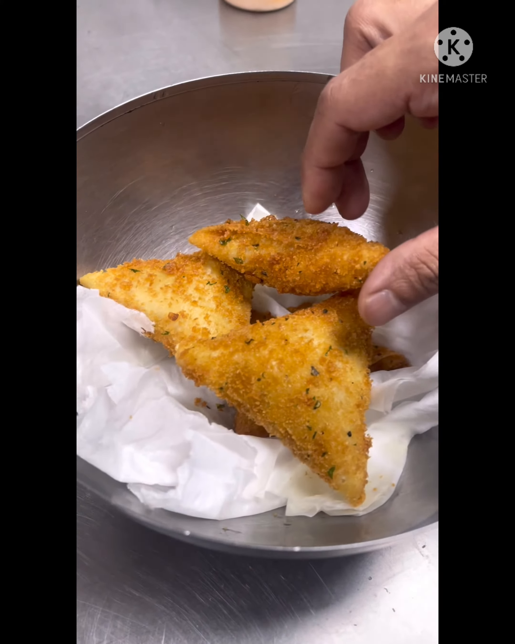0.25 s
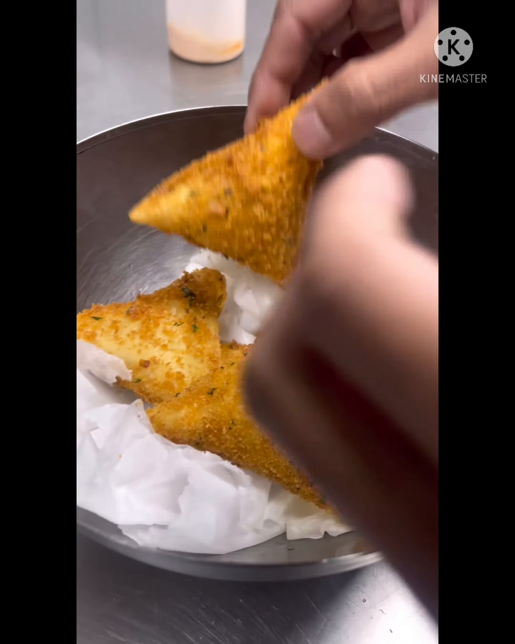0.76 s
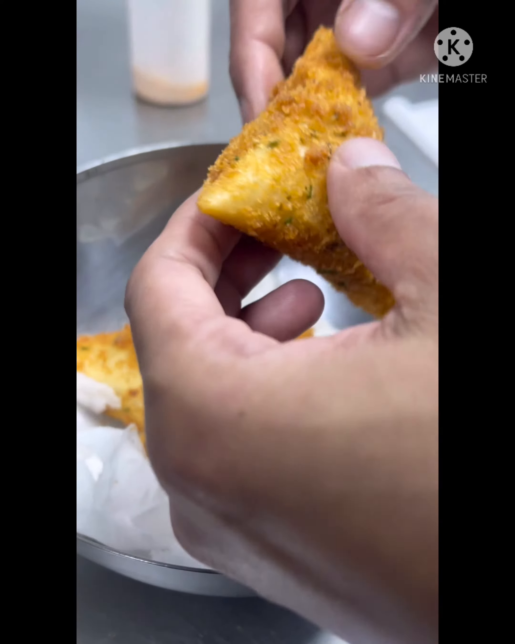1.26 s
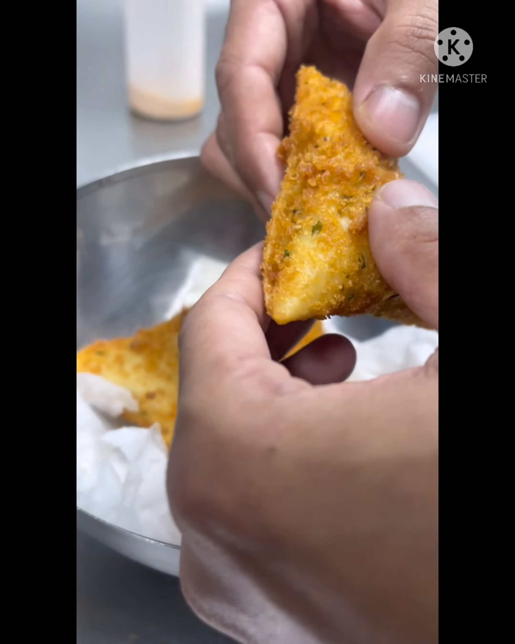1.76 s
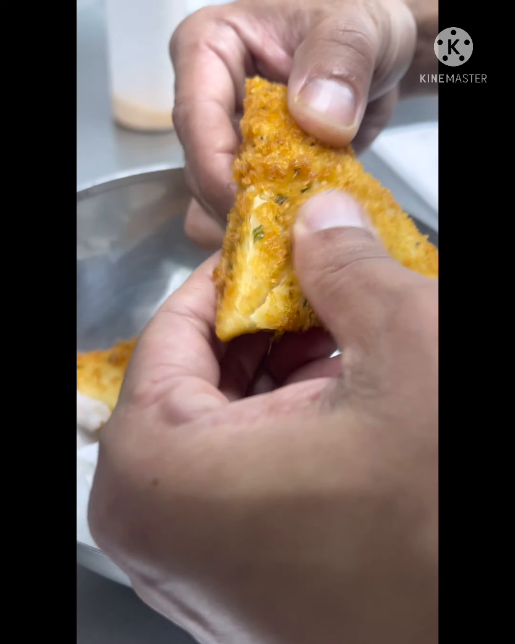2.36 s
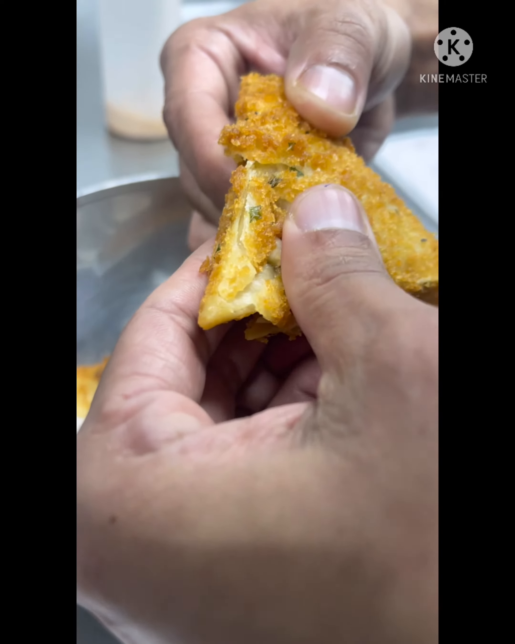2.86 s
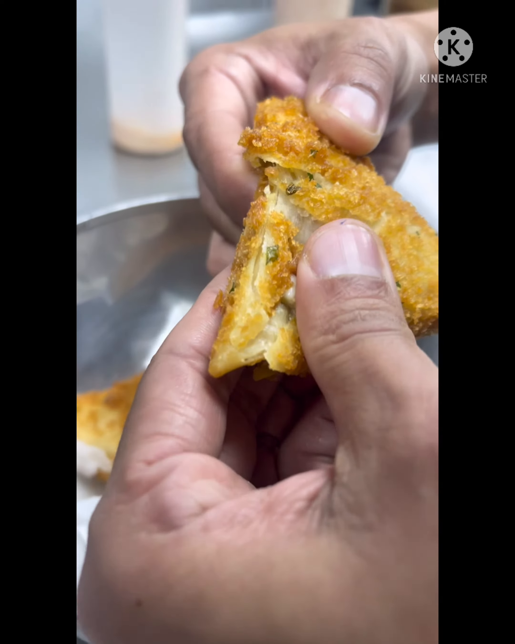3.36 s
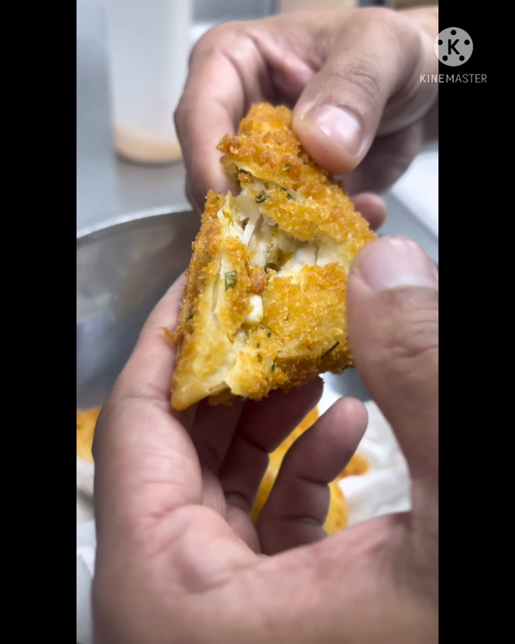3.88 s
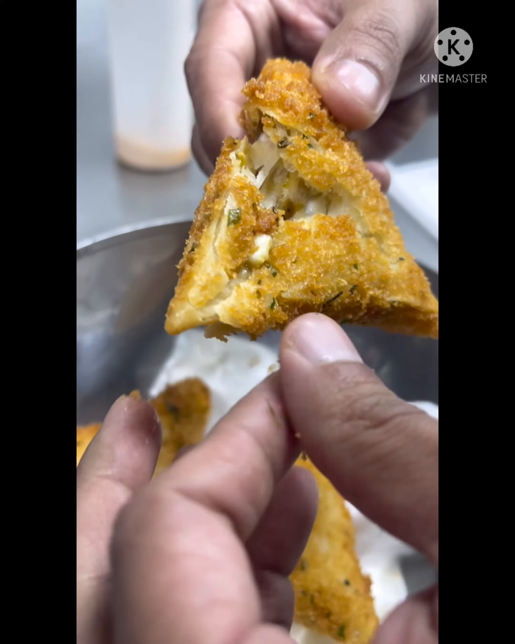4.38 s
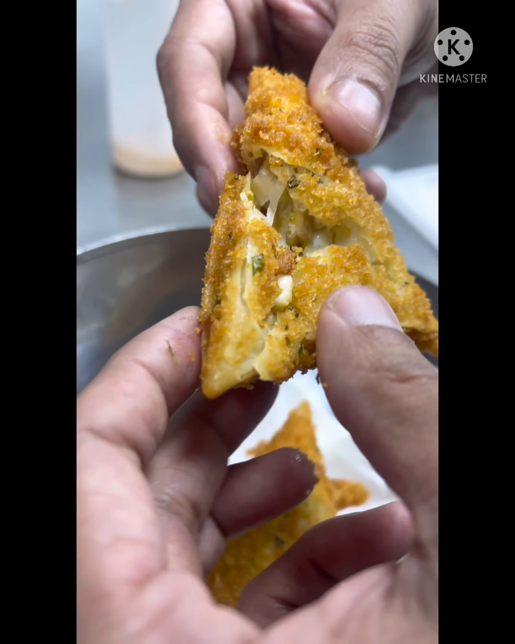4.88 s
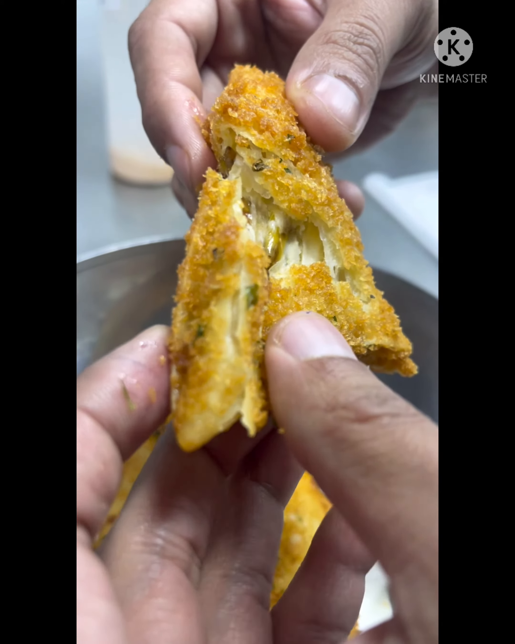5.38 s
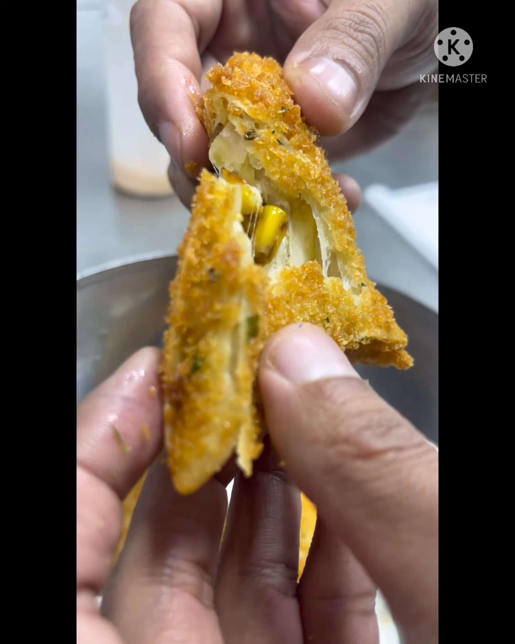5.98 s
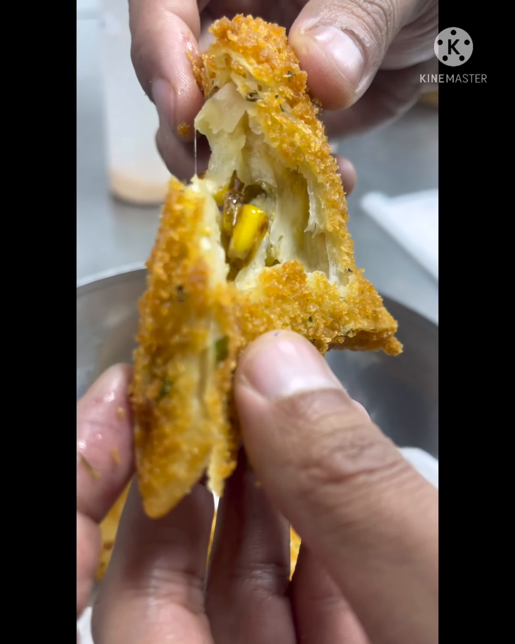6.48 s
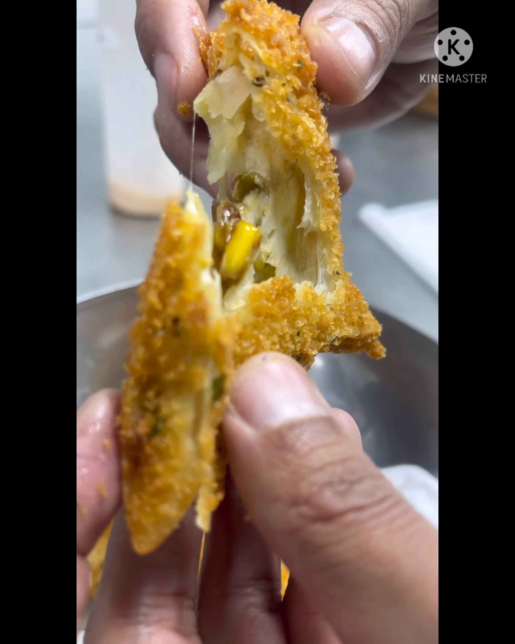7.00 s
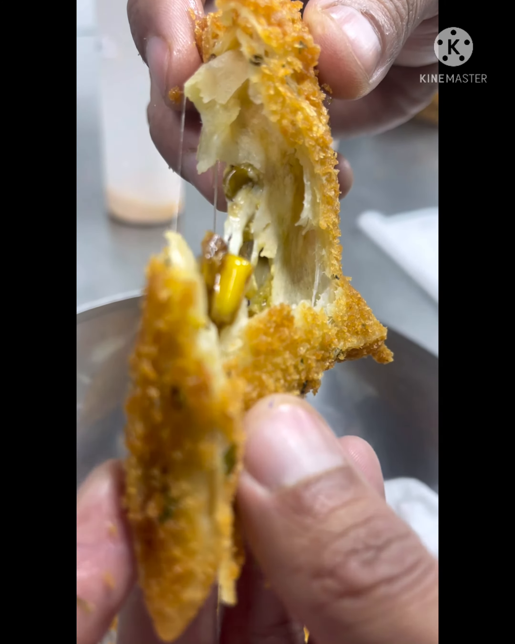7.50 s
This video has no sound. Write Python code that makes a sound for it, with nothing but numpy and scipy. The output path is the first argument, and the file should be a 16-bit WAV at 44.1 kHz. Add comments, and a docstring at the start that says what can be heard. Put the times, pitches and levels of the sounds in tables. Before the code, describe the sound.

Over the steady low rumble of a kitchen fan, paper rustles and a steel bowl scrapes and briefly squeaks as fingers pick up a breaded snack. Near the microphone the crust crackles, gives one crisp crunch and thins out into scattered little snaps. A heavy panel thumps twice across the room, the second time much louder, with a tiny high tink in between.

```python
"""In a kitchen, a breaded fried pastry is lifted from a paper-lined steel bowl and torn open close by.
Its crust fails by brittle fracture: single snaps, then one crunch with popping air pockets.
Friction grinds crumbs under the fingers and draws scrapes and squeaks from paper and steel;
a light touch rings one bright tink. Further off a heavy panel booms twice, and ventilation rumbles."""
import sys
import numpy as np
from scipy import signal
from scipy.fft import rfft, irfft
from scipy.io import wavfile
from scipy.ndimage import uniform_filter1d

SR = 44100
rng = np.random.default_rng(int(sys.argv[2]) if len(sys.argv) > 2 else 0)


def unload_wav(signal):
    """Save mono or channel-first audio to the path in sys.argv[1] as 16-bit WAV at rate SR, clipped to [-1, 1]."""
    wavfile.write(
        sys.argv[1],
        SR,
        np.round(np.clip(np.atleast_2d(signal).T, -1, 1) * 32767).astype(np.int16),
    )


N = 341504

# snaps of the crust: (time [s], level of the bright part [dB], level of the duller, lower part [dB])
SNAPS = [(0.2563, -50, -47), (0.2597, -48, -45), (0.2708, -47, -41), (0.4951, -49, -52), (0.5488, -55, -47),
         (0.5996, -44, -43), (0.6117, -42, -44), (0.6305, -39, -50), (0.638, -32, -50), (0.6445, -38, -50),
         (0.6521, -30, -40), (0.6562, -32, -43), (0.66, -26, -43), (0.682, -35, -43), (0.6931, -41, -42),
         (0.7135, -44, -42), (0.7264, -44, -51), (0.805, -49, -46), (0.8185, -38, -51), (0.8225, -49, -47),
         (0.8749, -42, -48), (0.891, -41, -45), (0.9178, -40, -47), (0.9211, -40, -48), (0.953, -37, -35),
         (0.956, -41, -41), (0.959, -44, -49), (0.9857, -49, -36), (0.992, -49, -40), (1.035, -39, -51),
         (1.1045, -49, -38.5), (1.249, -49, -52), (1.3673, -50, -51), (1.6045, -45, -51),
         (1.6649, -50, -41), (1.7264, -35, -41), (1.8461, -46, -50), (1.8513, -49, -53),
         (1.867, -34, -38.5), (1.978, -50, -48), (1.988, -36, -42), (2.0108, -33.5, -44),
         (2.0315, -49, -52), (2.066, -43, -48), (2.077, -44, -54), (2.0832, -25, -38), (2.0991, -27, -33.5),
         (2.1291, -29.5, -42), (2.1479, -43, -52), (2.1667, -41, -48), (2.2108, -38, -45),
         (2.2204, -30, -41), (2.23, -34, -42), (2.2554, -44, -53), (2.2625, -44, -47), (2.285, -26, -46),
         (2.3298, -36, -52), (2.3326, -36, -31), (2.3355, -37, -44), (2.343, -37, -44), (2.3563, -36, -34),
         (2.3588, -25, -39), (2.361, -30, -43), (2.3752, -34, -46), (2.3975, -28, -27.5),
         (2.4023, -19.5, -34), (2.416, -32, -34), (2.4194, -21, -31), (2.4274, -21, -31),
         (2.4302, -20, -36), (2.4353, -17, -29), (2.4395, -20, -28), (2.4447, -25, -31), (2.4555, -29, -37),
         (2.4698, -36, -33), (2.4765, -22, -28), (2.4806, -35, -38), (2.513, -43, -39), (2.5171, -42, -52),
         (2.5232, -42, -50), (2.5653, -37, -52), (2.5906, -43, -54), (2.7276, -49, -50),
         (2.7306, -34.5, -52), (2.7464, -37, -51), (2.7704, -35.5, -46), (2.8009, -42, -41),
         (2.8234, -44, -50), (2.8611, -41, -46), (2.899, -43, -39.5), (2.986, -47, -55), (3.0088, -48, -55),
         (3.0342, -49, -47), (3.0524, -40, -36.5), (3.0898, -49, -49), (3.3151, -47, -38.5),
         (3.3252, -44, -52), (3.336, -53, -51), (3.4137, -53, -48), (3.4473, -47, -42), (3.474, -51, -41),
         (3.486, -48, -48), (3.5084, -47, -43), (3.5185, -50, -48), (3.527, -41, -36.5), (3.5406, -43, -41),
         (3.5445, -48, -47), (3.5502, -53, -47), (3.5692, -48, -51), (3.6092, -48, -57), (3.8235, -52, -43),
         (3.8339, -44, -37.5), (4.3158, -50, -57), (4.55, -47, -55), (4.7272, -37.5, -51),
         (5.978, -38, -49), (7.0106, -46, -39.5), (7.4392, -44, -46), (7.5445, -52, -50), (7.571, -39, -54),
         (7.6704, -60, -50), (7.719, -42, -43), (7.7234, -52, -47)]
# bright part of a snap, as coloured by the microphone: (frequency [Hz], level [dB])
BRIGHT_SPECTRUM = [(1500, -45), (3500, -14), (5500, -17), (8000, -6.5), (10000, 1.5), (11200, 5),
                   (12200, 0), (13300, -19), (14500, -25), (16300, -49)]
# duller part of a snap, and the hollow inside the pastry: (frequency [Hz], level [dB])
DULL_SPECTRUM = [(400, 7.5), (1300, -12), (2500, 2), (4000, 1.5), (5500, 0.5), (7000, 2), (8500, 5.5),
                 (10500, 1), (14000, -12), (16300, -28)]
HOLLOW_SPECTRUM = [(250, -38), (600, 1.5), (1300, 10), (1900, 2.5), (2500, 11.5), (3100, -3), (4500, 1),
                   (7000, -17)]

def cracks(rise=0.00055, fall=0.00027, lead_s=0.0029, trail_fall=0.0027):
    """Brittle fracture: a crack runs through the crust, led and trailed by smaller breaks."""
    out, t = np.zeros(N), np.arange(SR // 40) / SR
    since = np.maximum(t - lead_s, 0)
    span = np.sqrt(0.002 * SR / len(t))  # levels are rms over 2 ms
    for start, bright_db, dull_db in SNAPS:
        burst = unit_rms(swell(since, rise, fall) ** 2 * rng.standard_normal(len(t)))
        before = unit_rms(swell(t, lead_s, fall) * rng.standard_normal(len(t)))
        after = unit_rms(swell(since, 2 * rise, trail_fall) * rng.standard_normal(len(t)))
        snap = burst + gain_of(-16) * before + gain_of(-14) * after
        hollow_db = 7.5 + 1.55 * dull_db  # mostly the deep cracks ring the hollow
        parts = (BRIGHT_SPECTRUM, bright_db), (DULL_SPECTRUM, dull_db + 1.5), (HOLLOW_SPECTRUM, hollow_db)
        for spectrum, db in parts:
            add(out, start - lead_s - rise, gain_of(db) * span * unit_rms(colour(snap, spectrum)))
    return out


# runs of breaking crumbs: (time [s], level [dB], rise [s], fall [s], relative hollow level [dB])
AVALANCHES = [(0.25, -45, 0.01, 0.029, 9), (0.642, -38, 0.0093, 0.013, 8), (0.672, -40.5, 0.019, 0.019, 7),
              (0.804, -41, 0.012, 0.018, 0), (0.851, -46, 0.023, 0.13, 9), (2.352, -36, 0.004, 0.071, -1),
              (2.397, -27, 0.011, 0.031, -1), (2.413, -22, 0.013, 0.02, 2), (2.473, -36, 0.0029, 0.016, 8)]
# spectrum of fine, bright crackle, with the top treble cut off: (frequency [Hz], level [dB])
CRACKLE_SPECTRUM = [(1500, -35), (3500, -12), (4900, -10), (5500, -7), (8000, -8), (8900, -1),
                    (10000, -5.5), (11200, 1), (12200, -2), (13500, -19), (14500, -33), (16300, -57)]

def crunches():
    """Cascading failure: avalanches of fractures crackle and excite the hollow inside."""
    out, t = np.zeros((2, N)), np.arange(SR // 5) / SR
    for start, db, rise, fall, hollow_db in AVALANCHES:
        envelope = swell(t, rise, fall)
        crackle = colour(envelope * grit(len(t), per_s=7600, spread_db=2.5), CRACKLE_SPECTRUM)
        hollow = colour(envelope * grit(len(t), per_s=7600, spread_db=2.5), HOLLOW_SPECTRUM)
        add(out, start, gain_of(db) * (crackle + gain_of(hollow_db - 9) * hollow))
    return out


# air pockets in the crust: (time [s], level [dB], frequency [Hz], fall [s])
AIR_POCKETS = [(0.9845, -38, 7460, 0.0012), (2.4153, -21, 1200, 0.0022), (2.4255, -25.5, 2140, 0.0046),
               (2.4265, -25.5, 2540, 0.004), (2.4305, -31, 640, 0.008), (2.476, -30.5, 1870, 0.0012),
               (7.4385, -35, 7050, 0.0011)]

def pops(rise=0.00047, ragged=0.34):
    """Damped oscillation: an air pocket caves in and rings briefly at its own frequency."""
    out, t = np.zeros(N), np.arange(SR // 20) / SR
    for start, db, hz, fall in AIR_POCKETS:
        waver = unit_rms(uniform_filter1d(rng.standard_normal(len(t)), size=30))
        envelope = (1 + ragged * waver) * swell(t, rise, fall)
        add(out, start, gain_of(db) * envelope * np.sin(2 * np.pi * hz * t))
    return out


# finger slides, one at each change of grip: (time [s], duration [s], relative level [dB])
FINGER_SLIDES = [(0.197, 0.42, -59), (0.57, 0.13, -49.5), (0.81, 0.17, -59), (1.11, 0.47, -64.5),
                 (1.601, 0.11, -50), (1.805, 0.13, -58), (1.994, 0.38, -54), (2.503, 0.42, -58),
                 (3.006, 0.11, -58), (3.43, 0.33, -56), (4.363, 0.084, -59), (4.529, 0.08, -56),
                 (4.714, 0.36, -59), (5.58, 0.16, -64), (6.266, 0.08, -62), (6.88, 0.19, -66),
                 (7.393, 0.18, -57.5)]
# spectrum of the rubbing of crumbs: (frequency [Hz], level [dB])
CRUMB_SPECTRUM = [(400, -24), (1200, 1), (2700, 5), (4500, -0.5), (7000, -2.5), (9500, 3), (11300, 2),
                  (12300, -6), (13200, -41), (14300, -46), (16000, -53)]

def rubbing(grip_s=0.027, release_s=0.05):
    """Granular friction: sliding fingers grind crumbs in dense small breaks and sparser large ones."""
    slip = np.full(N, gain_of(-73))  # just holding the pastry stirs a few crumbs
    t = np.arange(SR) / SR
    for start, duration, db in FINGER_SLIDES:
        stroke = np.minimum(t / grip_s, 1) * np.exp(-np.maximum(t - duration, 0) / release_s)
        add(slip, start, gain_of(db) * stroke)
    dense = colour(grit(N, per_s=3000, spread_db=3.5), CRUMB_SPECTRUM)
    sparse = colour(grit(N, per_s=560, spread_db=6), CRACKLE_SPECTRUM)
    return gain_of(2.5) * slip * (dense + gain_of(-7) * sparse)


# scrapes and paper rustles: (time [s], level [dB], centre [Hz], half-width [octaves], rise [s], fall [s])
DRAGS = [(0.328, -42, 3580, 0.53, 0.0054, 0.062), (0.59, -46, 4000, 3.2, 0.034, 0.075),
         (0.649, -36, 1600, 0.6, 0.0054, 0.01), (0.684, -35.5, 670, 0.51, 0.019, 0.013),
         (0.701, -36.5, 2750, 0.34, 0.014, 0.004), (0.83, -44, 2300, 2.5, 0.027, 0.18),
         (1.105, -49.5, 5500, 0.51, 0.0088, 0.055), (1.39, -43, 2150, 0.42, 0.015, 0.06),
         (1.405, -37, 667, 0.58, 0.013, 0.07), (1.636, -41.5, 3200, 0.45, 0.015, 0.079),
         (2.671, -41.5, 2700, 0.44, 0.011, 0.078), (3.33, -57, 4500, 1.5, 0.018, 0.16),
         (4.96, -48.5, 4500, 2, 0.043, 0.032), (7.41, -45, 8450, 0.6, 0.031, 0.085),
         (7.668, -51.5, 6000, 0.7, 0.008, 0.06)]
# modes of the steel bowl: (frequency [Hz], bandwidth [Hz], level re the plain scrape [dB])
BOWL_MODES = [(1850, 11, -12), (2096, 20, 10.5), (2635, 35, 10.5), (3300, 33, 6), (3620, 58, -18),
              (3940, 40, -5)]

def scrapes(top_hz=12000, gritty=0.54):
    """Friction noise: each soft drag excites one broad band, coloured by the bowl's resonances."""
    out, t = np.zeros((2, N)), np.arange(SR // 2) / SR
    hz = np.fft.rfftfreq(len(t), 1 / SR) + 1
    bowl = 1 + sum(gain_of(db) / (1 + 2j * (hz - mode_hz) / width) for mode_hz, width, db in BOWL_MODES)
    lowpass = (1 + (hz / top_hz) ** 40) ** -0.5
    for start, db, centre_hz, octaves, rise, fall in DRAGS:
        band = (1 + (np.log2(hz / centre_hz) / octaves) ** 4) ** -0.5
        drag = diffuse(len(t)) + gritty * grit(len(t), per_s=250, spread_db=-1)
        scrape = unit_rms(irfft(rfft(drag) * band * lowpass * bowl, len(t)))
        add(out, start, gain_of(db) * scrape * swell(t, rise, fall))
    return out


# skids on steel: (time [s], level [dB], pitch [Hz], rise [s], fall [s])
SKIDS = [(0.647, -33.5, 1546, 0.0093, 0.0056), (0.698, -39, 2990, 0.01, 0.0044),
         (1.395, -55, 1820, 0.025, 0.046), (1.64, -50, 2680, 0.012, 0.05)]
# partials of a skid: (frequency / pitch [ratio], level [dB])
SKID_PARTIALS = [(1.002, 2), (1.24, -6), (1.42, -8)]

def squeaks(jitter=0.019, flutter=0.49):
    """Stick-slip oscillation: a skid sings a few partials, unsteady in pitch and amplitude."""
    out, t = np.zeros((2, N)), np.arange(SR // 3) / SR
    for start, db, hz, rise, fall in SKIDS:
        tone = np.zeros((2, len(t)))
        for ratio, partial_db in SKID_PARTIALS:
            bend, grip = unit_rms(uniform_filter1d(rng.standard_normal((2, 2, len(t))), size=90))
            cycles = np.cumsum(hz * ratio * (1 + jitter * bend), axis=-1) / SR
            tone += gain_of(partial_db) * (1 + flutter * grip) * np.sin(2 * np.pi * cycles)
        add(out, start, gain_of(db) * unit_rms(spread(tone)) * swell(t, rise, fall))
    return out


# a light touch on something hard: (time [s], level [dB])
TOUCH = (4.3232, -23.5)
# its modes: (frequency [Hz], level [dB], T60 before the common fade [s])
TOUCH_MODES = [(8000, -12, .03), (8370, 7, 0.056), (10500, -5, .087), (10900, 1, 0.075), (11420, -2, 0.07),
               (11700, -2, .083), (12180, -11, .09), (13010, -17, .14)]
# spectrum of its chatter: (frequency [Hz], level [dB])
CHATTER_SPECTRUM = [(4000, -28), (6000, -20), (7500, -20), (8300, -3), (9200, 3), (10000, -2), (11400, -6),
                    (12900, -13), (13600, -28), (16000, -38)]

def tink(chatter_db=-11):
    """Impact excitation: a light touch rings a cluster of high modes, with a short chatter."""
    out, t = np.zeros(N), np.arange(SR // 5) / SR
    start, db = TOUCH
    modes = sum(gain_of(mode_db - 60 * t / t60) * np.sin(2 * np.pi * (hz * t + rng.random()))
                for hz, mode_db, t60 in TOUCH_MODES)
    ring = modes / abs(modes).max() * swell(t, rise=0.0017, fall=0.018)
    chatter = colour(rng.standard_normal(len(t)), CHATTER_SPECTRUM) * swell(t, rise=0.0012, fall=0.016)
    add(out, start, gain_of(db) * (ring + gain_of(chatter_db) * chatter))
    return out


# heavy bumps across the kitchen: (time [s], boom level [dB], rattle level [dB])
IMPACTS = [(3.9744, -25, -31.5), (6.4061, -10, -25)]
# modes of the panel: (frequency [Hz], level [dB], T60 before the common fade [s])
PANEL_MODES = [(172, -6, 0.13), (256, -2.5, 0.3), (289, 12, 0.054), (388, 13, 0.044), (439, -6, 0.21),
               (544, -6, 0.11), (694.5, -17, 0.22), (787, -7.5, 0.058), (893, -24, 0.3), (1088, -18, 0.074)]
# spectrum of the rattle: (frequency [Hz], level [dB])
RATTLE_SPECTRUM = [(90, -21), (200, 3.5), (420, 4.5), (700, -2.5), (1050, -9), (1650, -11.5), (2100, -18),
                   (3500, -20.5), (6500, -26), (11300, -21), (12400, -32), (13300, -60), (15000, -76)]

def bumps(rebound_s=0.0375, rebound_db=-10, room_db=-9, room_t60=0.39):
    """Modal vibration: a heavy panel booms, rattles and rebounds once; the boom reverberates."""
    out, t = np.zeros((2, N)), np.arange(SR * 3 // 4) / SR
    for start, db, rattle_db in IMPACTS:
        modes = sum(gain_of(mode_db - 60 * t / t60) * np.sin(2 * np.pi * hz * t)
                    for hz, mode_db, t60 in PANEL_MODES)
        boom = modes * swell(t, rise=0.018, fall=1)
        boom *= gain_of(db) / abs(boom).max()
        room = reflections(t, room_db, rise=0.045, fall=room_t60 / np.log(1000))
        rattle = colour(diffuse(len(t)), RATTLE_SPECTRUM) * swell(t, rise=0.0063, fall=0.071)
        add(out, start, boom)
        add(out, start + rebound_s, gain_of(rebound_db) * boom)
        add(out, start, signal.fftconvolve(boom[None], room, axes=1))
        add(out, start, gain_of(rattle_db) * rattle)
    return out


# duct rumble and rushing air: (frequency [Hz], spectral density [dB per Hz])
DUCT_SPECTRUM = [(18, -89), (31, -68), (42, -62), (62, -52), (80, -55), (140, -57.5), (210, -58),
                 (285, -57), (345, -58.5), (410, -70.5), (600, -72.5), (900, -77.5), (2000, -110),
                 (6000, -170)]
AIRFLOW_SPECTRUM = [(300, -101), (630, -74.5), (780, -81.5), (1000, -74), (1500, -79.5), (2000, -83.5),
                    (2800, -87.5), (3800, -93), (5200, -98), (8000, -97.5), (11200, -96.5), (12100, -109),
                    (13500, -140), (16000, -160)]
# tones of the fan: (frequency [Hz], rms level [dB])
FAN_PARTIALS = [(47.8, -41), (287, -48.5), (438, -59), (625, -60), (860, -60.5), (969, -63)]

def ventilation(waver=0.23, lowest_drift_hz=1.504):
    """Superposition: duct rumble and rushing air add in power beneath a few wavering fan tones."""
    hz = np.fft.rfftfreq(N, 1 / SR)
    density = np.hypot(gain_of(value_at(DUCT_SPECTRUM, hz)), gain_of(value_at(AIRFLOW_SPECTRUM, hz)))
    out = irfft(rfft(diffuse(N)) * density * np.sqrt(SR / 2), N)
    slow = np.exp(-(hz / 4) ** 2)  # passes fluctuations below about 4 Hz
    for tone_hz, db in FAN_PARTIALS:
        sway, drift = unit_rms(irfft(rfft(rng.standard_normal((2, N))) * slow, N))
        drift_hz = lowest_drift_hz * np.sqrt(tone_hz / FAN_PARTIALS[0][0])
        cycles = np.cumsum(tone_hz + drift_hz * drift) / SR
        out += gain_of(db) * np.sqrt(2) * (1 + waver * sway) * np.sin(2 * np.pi * cycles)
    return out


def kitchen(x, near_db=-11, room_db=-19, room_t60=0.18):
    """Reverberation: early reflections off hands and bowl, then the faint tail of a hard room."""
    t = np.arange(SR // 2) / SR
    early = reflections(t, near_db, rise=0.0006, fall=0.0028)
    late = reflections(t, room_db, rise=0.011, fall=room_t60 / np.log(1000))
    return x + signal.fftconvolve(x.mean(0)[None], early + late, axes=1)[:, :N]


def reflections(t, db, rise, fall):
    """Impulse response of a decaying diffuse field, with total energy db."""
    response = diffuse(len(t)) * swell(t, rise, fall)
    return gain_of(db) * response / np.linalg.norm(response[0])


# diffuse sound at the two microphone ports: (frequency [Hz], coherence [0 to 1])
COHERENCE = [(120, 1), (330, .97), (700, 0.058), (1200, 0.021), (1800, 0.91), (2700, 0.22), (3500, 0.057),
             (4900, 0.72), (5900, 0.66), (7200, 1), (9000, 1), (10200, 0.99), (11500, 0.98), (12300, 0.73)]

def spread(pair):
    """Partial coherence: two unrelated signals become one sound arriving from all sides."""
    size = pair.shape[-1]
    same = np.clip(value_at(COHERENCE, np.fft.rfftfreq(size, 1 / SR)), 0, 1)
    mid, side = rfft(pair) * np.sqrt([(1 + same) / 2, (1 - same) / 2])
    return irfft(np.array([mid + side, mid - side]), size)


def diffuse(size):
    """Diffuse field: white noise from all sides."""
    return spread(rng.standard_normal((2, size)))


def grit(size, per_s, spread_db):
    """Poisson process: tiny breaks of random size, scattered over the crust."""
    shape = (2, size)
    sizes = gain_of(spread_db * np.minimum(rng.exponential(1, shape), 4))
    signs = rng.choice([-1, 1], shape)
    breaks = rng.random(shape) < per_s / SR
    return spread(unit_rms(sizes * signs * breaks))


def colour(x, spectrum):
    """Minimum-phase filter with the given spectrum and unit energy."""
    log_gain = np.log(gain_of(value_at(spectrum, abs(np.fft.fftfreq(2048, 1 / SR)))))
    response = np.exp(np.conj(signal.hilbert(log_gain)))
    taps = np.fft.ifft(response).real[:1024]
    return np.apply_along_axis(signal.fftconvolve, -1, x, taps / np.linalg.norm(taps))[..., :x.shape[-1]]


def swell(t, rise, fall):
    """Smooth rise to 1, then exponential decay."""
    return np.sin(np.pi / 2 * np.minimum(t / rise, 1)) ** 2 * np.exp(-np.maximum(t - rise, 0) / fall)


def gain_of(db):
    return 10 ** (np.asarray(db) / 20)


def unit_rms(x):
    return x / np.sqrt(np.mean(x ** 2) + 1e-20)


def value_at(spectrum, hz):
    """Interpolation on a log-frequency axis."""
    frequencies, values = np.transpose(spectrum)
    return np.interp(np.log(hz + 1), np.log(frequencies + 1), values)


def add(mix, start, sound):
    """Superposes a sound on the mix from start [s]."""
    part = mix[..., max(round(start * SR), 0):][..., :sound.shape[-1]]
    part += sound[..., :part.shape[-1]]


def scene():
    """Superposition of the pastry close by and the kitchen behind it."""
    close = cracks() + pops() + crunches() + rubbing() + squeaks() + tink()
    return kitchen(close) + scrapes() + bumps() + ventilation()


# lead of the left microphone port over the right: (frequency [Hz], phase [rad])
PHASE_LEAD = [(20, 0), (1800, 0), (2800, 1), (3800, 1), (4500, 2.1), (4900, 3.1), (5500, 6.1), (6150, 6.3),
              (8000, 8.3), (8550, 9.25), (9400, 9.5), (12100, 12.55), (13800, 12.6), (16000, 15.7)]

def record(dry, cutoff_hz=16300):
    """Phase shift and band limit: the left port leads in the treble, then both are low-passed."""
    lead = np.interp(np.fft.rfftfreq(N, 1 / SR), *np.transpose(PHASE_LEAD))
    pair = irfft(rfft(dry) * np.exp(1j * np.outer([0.5, -0.5], lead)), N)
    lowpass = signal.firwin(511, cutoff_hz, window=("kaiser", 9), fs=SR)
    return signal.oaconvolve(pair, lowpass[None], "same")


dry = scene()
out = record(dry)
unload_wav(out)
```